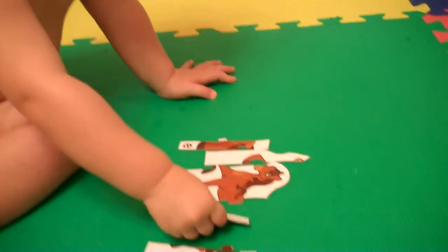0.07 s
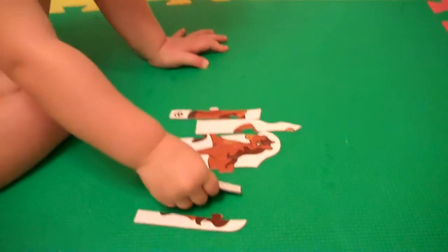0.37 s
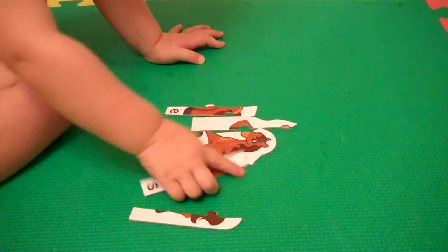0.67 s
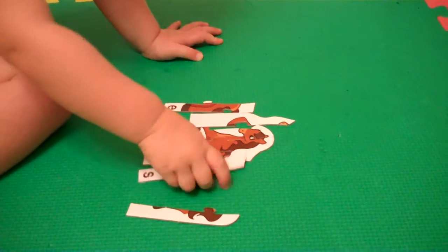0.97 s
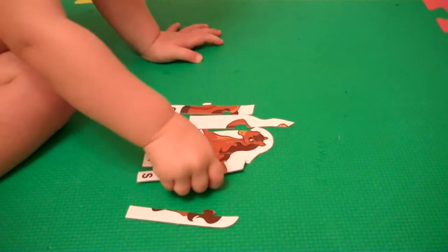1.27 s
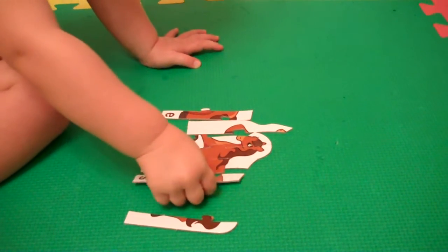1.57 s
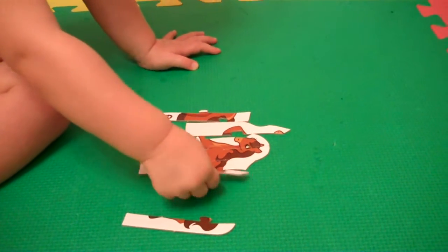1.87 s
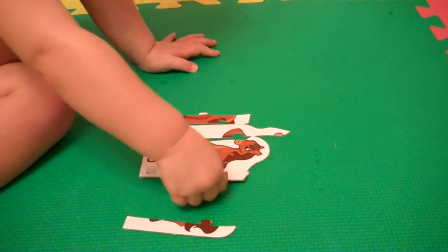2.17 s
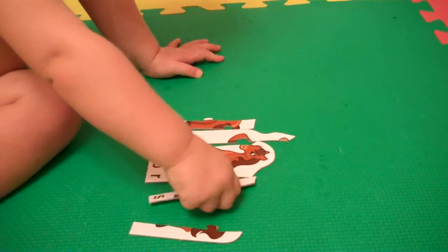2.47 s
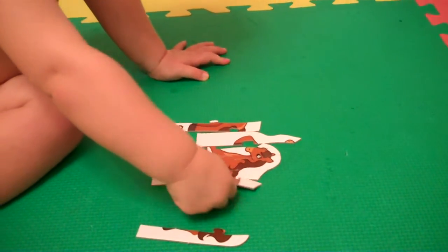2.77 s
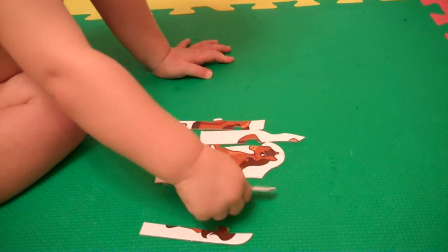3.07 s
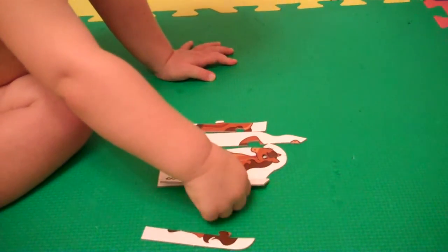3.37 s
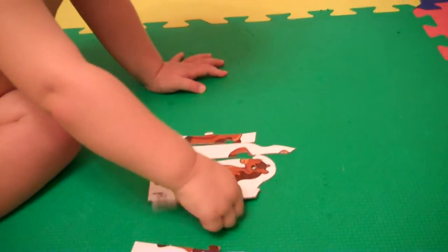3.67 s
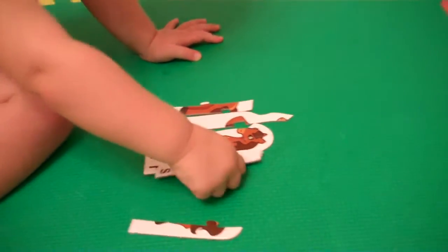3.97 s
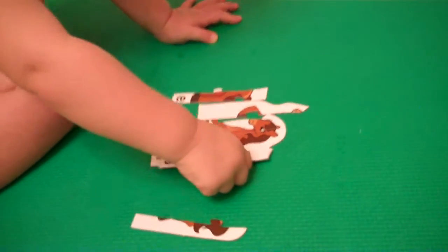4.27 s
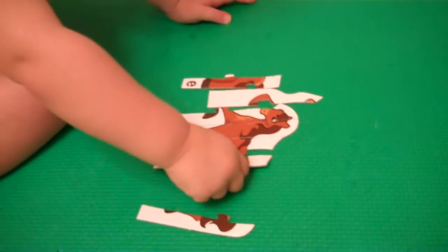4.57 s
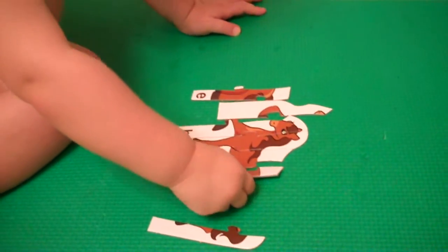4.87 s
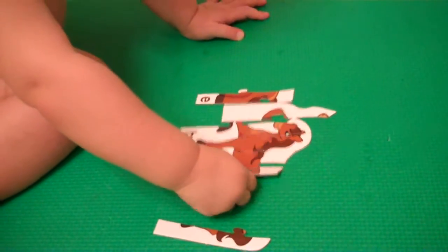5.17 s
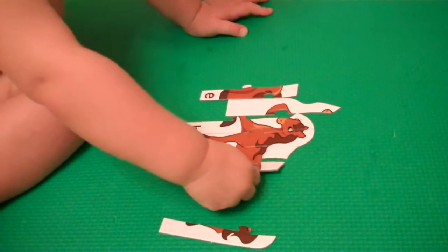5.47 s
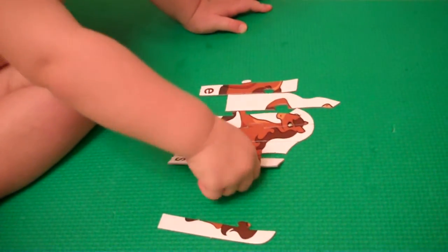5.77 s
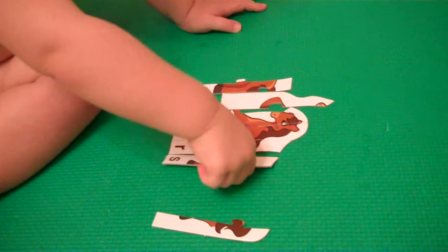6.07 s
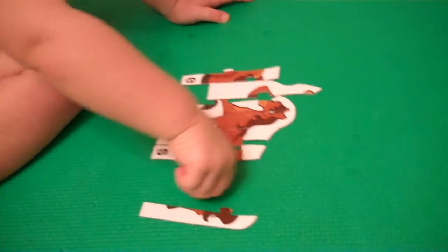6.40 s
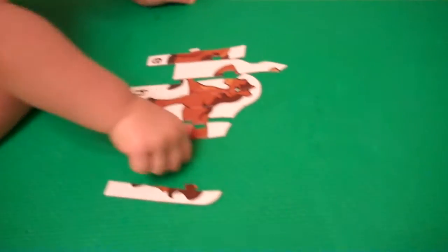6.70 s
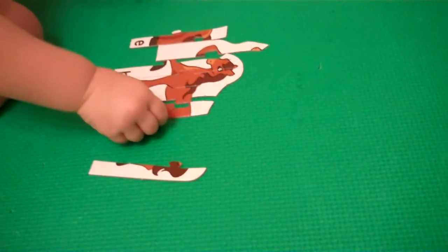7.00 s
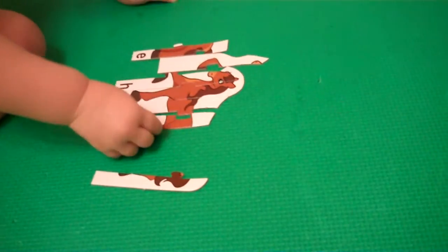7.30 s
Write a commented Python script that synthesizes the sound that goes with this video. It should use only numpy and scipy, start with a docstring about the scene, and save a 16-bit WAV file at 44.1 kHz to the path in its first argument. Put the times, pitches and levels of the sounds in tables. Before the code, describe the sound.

Stiff puzzle strips are pushed together on a foam mat, close to the microphone in a small, quiet room with a faint steady hiss. A bright tick and a short scrape open the sound. Around 0.8 seconds come a couple of damped knocks, then scraping and ticks until about 1.2. A sharp snap lands at 1.6 seconds and a quick cluster of clicks and knocks near 2.5. From about 3 to 4 seconds the edges scrape and tick in short bursts while the underside rubs dully on the foam. Another sharp snap comes at 4.6 seconds, followed by scattered bright ticks until about 6. The strongest snap and knock falls near 6.4 seconds. At 7 there is a last short scrape and rub, ending in a faint stutter of ticks. Faint finger taps occur throughout, and the clicks have a crisp, bright edge.

```python
"""A bright tick and a short scrape, close by: a child pushes a stiff puzzle strip in among others on foam.
Edges tick, scrape and stutter on each other while the underside rubs dully over the mat.
Now and then a strip snaps down with a short knock, its modes damped by the foam.
The hand scatters the treble and a small, quiet room echoes over a faint hiss.
Two microphone ports ring in the treble, each at its own pitch, giving every click a bright edge."""
import sys
import numpy as np
from scipy import signal
from scipy.fft import rfft, irfft
from scipy.io import wavfile

SR = 44100
rng = np.random.default_rng(int(sys.argv[2]) if len(sys.argv) > 2 else 0)


def wrap_up_sound(samples):
    """Save the sound to the file named by the first command line argument, as 16-bit audio."""
    columns = np.atleast_2d(samples).T
    # keep every value between -1 and 1, then stretch to whole-number steps
    tamed = np.clip(columns, -1, 1)
    steps = np.round(tamed * 32767).astype(np.int16)
    wavfile.write(sys.argv[1], SR, steps)


N = 323694
TIME, HZ = np.arange(N) / SR, np.fft.rfftfreq(N, 1 / SR)


def amp(db):
    """dB to gain."""
    return 10 ** (np.asarray(db) / 20)


def unit(x):
    """Scale to energy 1."""
    return x / np.sqrt(np.sum(x ** 2) + 1e-20)


def read(points, hz):
    """Interpolate on a log-frequency axis."""
    f, value = np.transpose(points)
    return np.interp(np.log(hz + 1), np.log(f), value)


def add(mix, start_s, sound):
    """Mix in at start_s."""
    part = mix[max(round(start_s * SR), 0):][:len(sound)]
    part += sound[:len(part)]


def colour(x, points, size=4096):
    """Minimum-phase filter with the given spectrum."""
    log_gain = np.log(amp(read(points, abs(np.fft.fftfreq(size, 1 / SR)))))
    response = np.exp(np.conj(signal.hilbert(log_gain)))
    taps = np.fft.ifft(response).real[:size // 2]
    return signal.oaconvolve(x, taps)[:N]


def low_pass(x, hz, size=401):
    """Steep stereo low-pass."""
    taps = signal.firwin(size, hz, window=("kaiser", 8), fs=SR)
    return signal.oaconvolve(x, taps[None], "same")


def resonate(x, hz, width_hz):
    """Moving resonance of gain 1: shift hz to zero, smooth, shift back."""
    turn = np.exp(2j * np.pi * np.cumsum(hz * np.ones(len(x))) / SR)
    pole = np.exp(-np.pi * width_hz / SR)
    return 2 * (turn * signal.lfilter([1 - pole], [1, -pole], x / turn)).real


def stroke(start_s, length_s, release_s, swell_db=0, attack_s=0.004):
    """Envelope of one push: attack, steady swell or fade, release."""
    t = TIME - start_s
    attack = np.clip(t / attack_s + 0.5, 0, 1)
    swell = amp(swell_db * (np.clip(t / length_s, 0, 1) - 0.5))
    release = np.exp(-np.clip((t - length_s) / release_s, 0, 20))
    return attack * swell * release


def friction(grains_per_s, spread_db, flutter_db, flutter_s):
    """Tiny slips of uneven size, in clumps; rms 1."""
    sizes = amp(spread_db * np.minimum(rng.exponential(1, N), 4)) * rng.standard_normal(N)
    slips = sizes * (rng.random(N) < grains_per_s / SR)
    knots_s = np.arange(0, TIME[-1], flutter_s)
    flutter = np.interp(TIME, knots_s, rng.standard_normal(N)[:len(knots_s)])
    slips *= amp(flutter_db * flutter)
    return slips / slips.std()


def contact(hz, chatter, decay_s, ring, width_hz, size=512):
    """Rough edges hit and chatter; the corner rings at hz. Returns start offset/s and sound."""
    t = (np.arange(size) - size // 2) / SR
    grit = unit(rng.standard_normal(size) * np.exp(np.minimum(t * 2, -t) / decay_s))
    push = signal.unit_impulse(size, "mid") + chatter * grit
    sound = push + ring * resonate(resonate(push, hz, width_hz), hz, width_hz)
    bright_part = resonate(sound, hz, 2 * width_hz)
    return t[0], sound / np.linalg.norm(bright_part)


# room air and microphone hiss, left and right: f/Hz, density/(dB per Hz)
HISS_SPECTRA = [
    [(20, -99), (250, -93), (520, -92.5), (1200, -94.5), (4600, -101), (5000, -99), (5500, -102),
     (7200, -99), (8500, -104), (14000, -106)],
    [(20, -92.5), (300, -103), (520, -95), (800, -101), (4700, -102), (5000, -94.5), (5350, -102),
     (6050, -100), (7200, -105), (14000, -106)],
]


def background(cutoff_hz=14150):
    """Faint steady hiss, independent per channel."""
    hiss = [irfft(rfft(rng.standard_normal(N)) * amp(read(side, HZ)), N) for side in HISS_SPECTRA]
    return low_pass(np.array(hiss) * np.sqrt(SR / 2), cutoff_hz)


# echo decay: f/Hz, t60/s
ROOM_DECAY = [(500, 0.2949), (7000, 0.32), (14000, 0.3)]
# echo strength: f/Hz, level/dB
ROOM_SPECTRUM = [(100, -12), (250, -10), (600, -6.5), (1100, -11), (2000, -12.5), (7000, -17)]


def room(x, delay_s=0.00429, build_s=0.0011, apart_hz=4500, size=22050):
    """Small furnished room; the close ports share low echoes and hear different treble."""
    hz, t, bins = signal.stft(rng.standard_normal((2, size)), SR, nperseg=256)
    coherence = np.exp(-(hz[:, None] / apart_hz) ** 2)
    bins[1] = coherence * bins[0] + np.sqrt(1 - coherence ** 2) * bins[1]
    decay_per_s = np.log(1000) / read(ROOM_DECAY, hz)[:, None]
    gain = np.sqrt(2 * decay_per_s / SR) * amp(read(ROOM_SPECTRUM, hz))[:, None]
    bins *= gain * np.exp(-decay_per_s * t)
    tail = signal.istft(bins, SR, nperseg=256)[1][:, :size]
    tail *= np.clip((np.arange(size) / SR - delay_s) / build_s, 0, 1)
    return signal.fftconvolve(x[None], tail, axes=1)[:, :N]


def hand_scatter(x, gain_db=-9, above_hz=3500, decay_s=0.0041, size=256):
    """Fingers and mat scatter the treble differently toward each port."""
    paths = rng.standard_normal((2, size)) * np.exp(-np.arange(size) / SR / decay_s)
    paths = np.array([unit(path) for path in paths]) * amp(gain_db)
    paths = signal.lfilter(*signal.butter(2, above_hz, "high", fs=SR), paths)
    return signal.oaconvolve(x[None], paths, axes=1)[:, :N]


def fidgets(per_s=7, tap_db=-22, tick_db=-44):
    """Faint finger taps on the mat and brushing edges, at random throughout."""
    taps, ticks = (rng.random((2, N)) < per_s / SR) * (2 * rng.random((2, N)) - 1)
    return colour(amp(tap_db) * taps, RUB_SPECTRUM) + colour(amp(tick_db) * ticks, EDGE_SPECTRUM)


def stutter(start_s=7.172, end_s=7.29, slip_s=0.0112, jitter_s=0.001, gain_db=-42, spread_db=2.5):
    """An edge sticks and slips in a quick, uneven run of ticks."""
    out = np.zeros(N)
    for at_s in np.arange(start_s, end_s, slip_s):
        late, strength = rng.standard_normal(2)
        offset_s, tick = contact(hz=6200, chatter=0.3, decay_s=0.001, ring=2.2, width_hz=1600)
        add(out, at_s + offset_s + jitter_s * late, amp(gain_db + spread_db * strength) * tick)
    return colour(out, EDGE_SPECTRUM)


# edge digging in: t/s, length/s, relative level/dB
EDGE_BITES = [(0.964, 0.0068, -53), (1.878, 0.0046, -54), (3.171, .01, -51), (3.403, 0.0055, -37.5),
              (3.871, 0.017, -49.5), (4.051, 0.017, -58), (5.125, .018, -56)]
# bite colour: f/Hz, level/dB
BITE_SPECTRUM = [(200, -25), (1200, -11), (2500, -0.5), (4000, -5.5), (6000, -21.5), (14000, -25)]


def bites(gain_db=9, release_s=0.003):
    """A rough edge digs in: coarse slips, gritty midrange."""
    force = sum(amp(db + gain_db) * stroke(at_s, length_s, release_s)
                for at_s, length_s, db in EDGE_BITES)
    grit = friction(grains_per_s=5500, spread_db=2, flutter_db=0, flutter_s=0.003)
    return colour(force * grit, BITE_SPECTRUM)


# sliding strip: t/s, length/s, relative scrape level/dB, relative rub level/dB, swell/dB
SLIDE_STROKES = [(0.008, 0.027, -43, -55.5, 2), (0.605, 0.04, -44.5, -63.5, -10.5),
                 (0.848, 0.017, -44, -42, 7), (0.871, 0.11, -47.5, -56.5, -8.5), (1.12, 0.024, -49, -68, 6),
                 (1.15, 0.034, -40, -55, 0.5), (1.19, 0.054, -50.5, -56, -3),
                 (1.935, 0.039, -51.5, -62.5, 2), (2.23, 0.13, -61.5, -69, 12),
                 (2.361, 0.013, -44.5, -51.5, 1), (2.431, 0.084, -44.5, -60, -1.5),
                 (2.684, .14, -62.5, -74, -1), (2.925, .028, -43.5, -50.5, -4),
                 (2.953, 0.07, -57.5, -78, 0), (3.098, 0.074, -45, -66, 4), (3.404, .02, -40.5, -51, -8),
                 (3.621, 0.08, -50, -74, -14.5), (3.855, .04, -47.5, -57, 21.5),
                 (3.913, 0.069, -44, -57, -5), (4.0, 0.074, -54.5, -65, 15.5), (4.105, 0.062, -58, -77, 0),
                 (4.457, 0.13, -47.5, -67.5, 10.5), (5.13, 0.01, -36.5, -55, 1.5),
                 (5.331, 0.057, -46.5, -62.5, -3), (6.955, 0.017, -42.5, -59, -3),
                 (6.984, .068, -39.5, -68, 4)]
# hand shoving or settling on foam: t/s, length/s, relative level/dB
HAND_SHOVES = [(1.942, 0.0084, -58.5), (2.473, .015, -55), (5.335, 0.0069, -52.5), (7.046, .06, -53),
               (7.149, .12, -61.5)]
# edge sliding on edge: f/Hz, level/dB
SCRAPE_SPECTRUM = [(50, -34.5), (500, -9), (1500, 1), (4000, -4), (13500, -3.5), (15000, -17)]
# rub on foam: f/Hz, level/dB
RUB_SPECTRUM = [(40, -26), (110, -9), (220, 5), (550, -0.5), (1200, -8.5), (3000, -16.5), (8000, -44.5)]


def slides(scrape_db=-13, rub_db=12, shove_db=12, ring=1.3, scrape_release_s=0.0082, rub_release_s=0.0085):
    """Edges scrape brightly, ringing the ticking corner; underside and hand rub dully on foam."""
    scrape_force, rub_force = np.zeros((2, N))
    for at_s, length_s, edge_db, mat_db, swell_db in SLIDE_STROKES:
        scrape_force += amp(edge_db + scrape_db) * stroke(at_s, length_s, scrape_release_s, swell_db)
        rub_force += amp(mat_db + rub_db) * stroke(at_s, length_s, rub_release_s, swell_db)
    for at_s, length_s, db in HAND_SHOVES:
        rub_force += amp(db + shove_db) * stroke(at_s, length_s, rub_release_s)
    scrape = friction(grains_per_s=8000, spread_db=2.5, flutter_db=2, flutter_s=0.0044)
    scrape += ring * resonate(scrape, corner_hz(TIME), width_hz=1300)
    rub = friction(grains_per_s=4000, spread_db=1.5, flutter_db=1.5, flutter_s=0.01)
    return colour(scrape * scrape_force, SCRAPE_SPECTRUM) + colour(rub * rub_force, RUB_SPECTRUM)


# edge ticks: t/s, relative level/dB, f/Hz
EDGE_TICKS = [(0.0102, -25.5, 6150), (0.2966, -42.5, 6650), (0.605, -29, 6600), (0.7607, -37, 6540),
              (0.9138, -34, 6140), (1.2024, -29, 5900), (1.209, -19, 5860), (1.2275, -28.5, 5860),
              (1.512, -28, 5850), (1.5759, -20.5, 5900), (1.76, -35.5, 6960), (1.9279, -20.5, 5940),
              (2.363, -18.5, 7630), (3.0939, -33, 5800), (3.1114, -29, 6260), (3.4236, -24.5, 6760),
              (3.4712, -32.5, 6100), (3.6157, -22, 6100), (3.8908, -29, 7200), (4.4341, -27, 6100),
              (5.0455, -19, 5980), (5.1258, -21.5, 5900), (5.247, -29, 5930), (5.3358, -34, 5960),
              (5.445, -33.5, 5980), (5.452, -33.5, 5800), (5.7348, -26, 6010), (5.7392, -21, 5800),
              (5.9165, -30.5, 6110), (6.2167, -37, 6030), (6.9563, -32, 6900), (7.216, -28, 6240),
              (7.2696, -30.5, 6300)]
# edge contact colour: f/Hz, level/dB
EDGE_SPECTRUM = [(50, -22.5), (200, -3), (3000, -1), (6000, -2.5), (9000, 0.5), (16000, -6)]


def edge_ticks(gain_db=-5):
    """Edges catch and slip; each slip rings a corner."""
    out = np.zeros(N)
    for at_s, db, hz in EDGE_TICKS:
        offset_s, tick = contact(hz, chatter=0.54, decay_s=0.001066, ring=1.66, width_hz=1500)
        add(out, at_s + offset_s, amp(db + gain_db) * tick)
    return colour(out, EDGE_SPECTRUM)


def corner_hz(at_s):
    """Corner pitch, gliding from tick to tick."""
    tick_s, _, tick_hz = np.transpose(EDGE_TICKS)
    return np.interp(at_s, tick_s, tick_hz)


# strip on foam, before grip and strike position: f/Hz, relative level/dB, t60/s
STRIP_MODES = [(243.59, -6.5, 0.038), (385, 3.5, 0.023), (552.6, 2.5, 0.028), (668, 0, 0.016),
               (795, 0.5, 0.024), (928, -4, 0.017), (1191, 5, 0.022), (1478, 12, 0.011053),
               (1680, -6.5, 0.037), (2400, -11, 0.00776), (3050, -2, 0.0042)]
# mode row bounds: thud start, ring start, clack start, end
FAMILY_BOUNDS = [0, 2, 6, 11]
# strips knocking together: t/s, relative level/dB of thud, ring, clack and click, grip pitch factor
BLOWS = [(0.0316, -56, -61, -55.5, -31.5, 1), (0.8064, -33, -35, -47.5, -36, 0.96),
         (0.8195, -29, -28, -49, -28.5, .83), (0.8551, -42, -39, -57, -45, 0.83),
         (0.8668, -42.5, -31.5, -47, -51, 1.32), (1.555, -57, -43.5, -59, -47, 0.97),
         (1.5723, -33, -21.5, -24.5, -14.5, 1.01), (2.034, -51, -44, -57, -39.5, 1.07),
         (2.2013, -59.5, -55, -64.5, -58, 0.88), (2.3756, -41.5, -42, -42.5, -50, 1.05),
         (2.477, -39.5, -43, -52.5, -29, 1.1), (2.529, -40, -30, -39.5, -29.5, 1.28),
         (2.5396, -38.5, -26.5, -30, -21, 1.006), (2.9184, -40.5, -38.5, -43, -26.5, 0.94),
         (2.928, -43, -38.5, -48, -39, 1.03), (3.4057, -46.5, -47.5, -38, -48, 1.66),
         (3.897, -40, -37.5, -45.5, -48, 0.866), (4.3283, -37.5, -40, -40.5, -25, 1.1),
         (4.5569, -37.5, -41.5, -60, -42, .874), (4.6049, -35.5, -24, -26.5, -17.5, 1),
         (5.14, -70, -45.5, -55, -43, 1.25), (5.7497, -49, -35.5, -44, -27, 0.96),
         (6.006, -57, -55, -71, -48.5, 0.78), (6.4475, -27.5, -18.5, -24.5, -12.5, 1.4)]


def knocks(thud_db=22, ring_db=23, clack_db=23, place_db=2, cutoff_ratio=1.52, size=4096):
    """A blow thuds on the mat and rings the strip; where it lands shifts each mode's share."""
    out, t = np.zeros(N), np.arange(size) / SR
    hz, db, t60_s = np.transpose(STRIP_MODES)[:, :, None]
    places = rng.standard_normal((len(BLOWS), len(STRIP_MODES), 1))
    for (at_s, thud, ring, clack, _, grip), place in zip(BLOWS, places):
        fade = amp(db + place_db * place) * np.exp(-np.log(1000) * t / t60_s)
        # a firm grip raises the strip's low modes most and leaves the mat alone
        families = [(thud + thud_db, 1), (ring + ring_db, grip), (clack + clack_db, np.sqrt(grip))]
        for k, (level_db, pitch) in enumerate(families):
            rows = slice(FAMILY_BOUNDS[k], FAMILY_BOUNDS[k + 1])
            mode_hz = pitch * hz[rows]
            modes = (fade[rows] * np.cos(2 * np.pi * mode_hz * t)).sum(0)
            # foam softens the onset
            cushion = signal.butter(2, min(cutoff_ratio * mode_hz.mean(), SR / 4), fs=SR)
            add(out, at_s, -amp(level_db) * unit(signal.lfilter(*cushion, modes)))
    # a small strip radiates little bass
    return colour(out, [(30, -17), (120, -11), (260, 1)])


def snaps(gain_db=2.5, edge_hz=7600, corner_share=0.3):
    """Each blow opens with a click of stiff edge and corner; harder ones chatter longer."""
    out = np.zeros(N)
    for at_s, _, _, _, click_db, _ in BLOWS:
        hz = edge_hz + corner_share * (corner_hz(at_s) - edge_hz)
        decay_s = 0.00088 + 0.0058 * amp(click_db)
        offset_s, click = contact(hz, chatter=1.3, decay_s=decay_s, ring=1.4, width_hz=2300)
        add(out, at_s + offset_s, amp(click_db + gain_db) * click)
    return colour(out, EDGE_SPECTRUM)


def scene(positions=5):
    """Strips, hand scatter and room echo; the paths crossfade as the hand moves."""
    strips = edge_ticks() + snaps() + knocks() + slides() + bites() + stutter() + fidgets()
    out = np.array([strips, strips])
    step_s = TIME[-1] / (positions - 1)
    for at_s in np.linspace(0, TIME[-1], positions):
        share = np.cos(np.pi / 2 * np.minimum(abs(TIME - at_s) / step_s, 1))
        out += hand_scatter(strips * share) + room(strips * share)
    return out


# microphone port resonance, left and right: f/Hz, level/dB
PORT_RESPONSES = [
    [(3000, 0), (4500, 8.5), (5300, 16), (6200, 21), (7300, 24.5), (8000, 18), (9000, 8.5), (10500, 1),
     (14000, 1.5), (16000, -26)],
    [(3000, 0.5), (4500, 8.5), (5300, 17), (6050, 25), (6700, 16), (8300, 0), (14000, -10), (16000, -6)],
]


def record(dry, ceiling=0.9, cutoff_hz=16300):
    """Port resonances, hiss, soft overload on the hardest snaps, band limit."""
    heard = np.array([colour(x, port) for x, port in zip(dry, PORT_RESPONSES)]) + background()
    limited = heard / (1 + (heard / ceiling) ** 4) ** 0.25
    return low_pass(limited, cutoff_hz)


dry = scene()
out = record(dry)
wrap_up_sound(out)
```